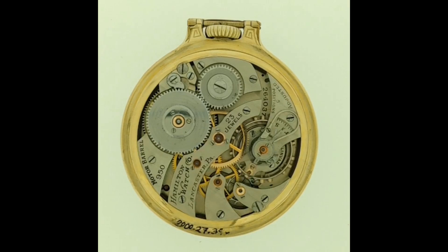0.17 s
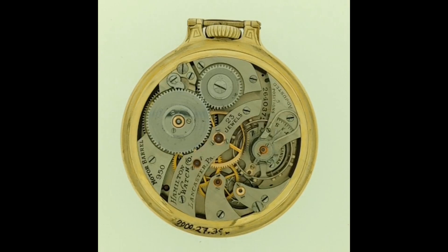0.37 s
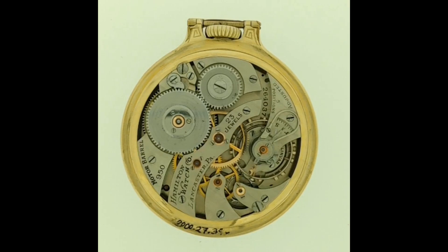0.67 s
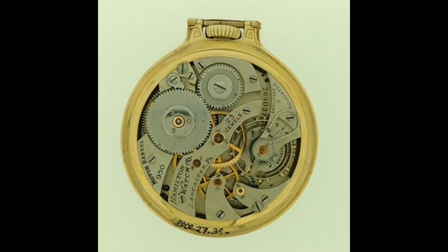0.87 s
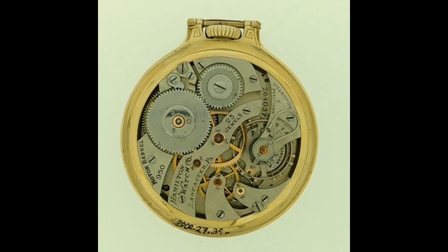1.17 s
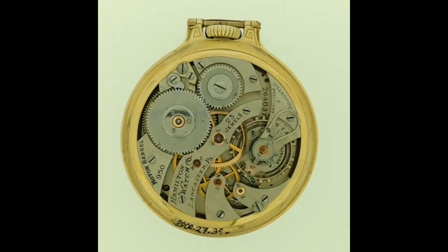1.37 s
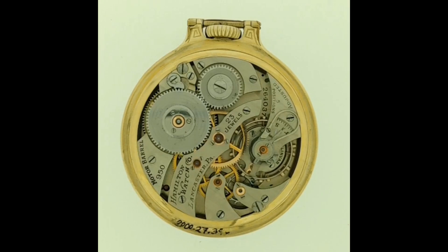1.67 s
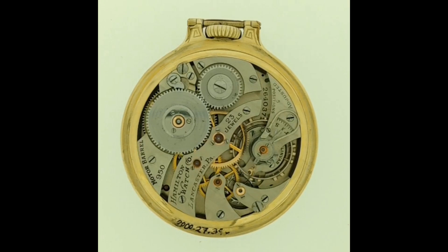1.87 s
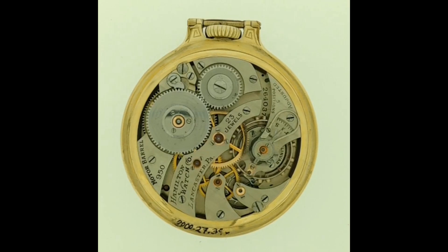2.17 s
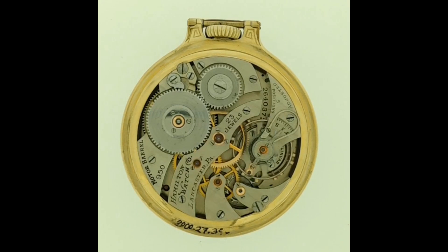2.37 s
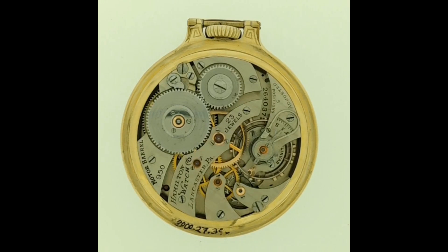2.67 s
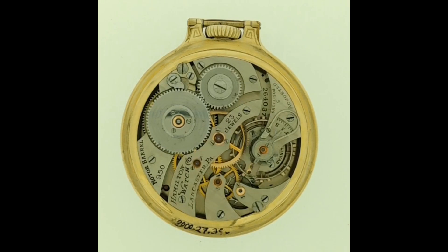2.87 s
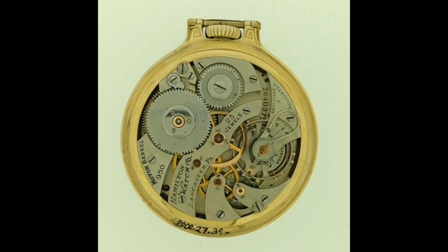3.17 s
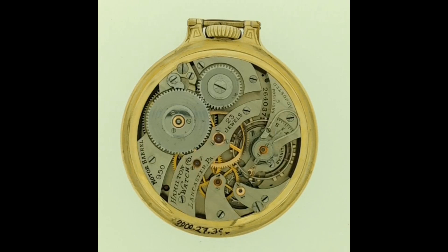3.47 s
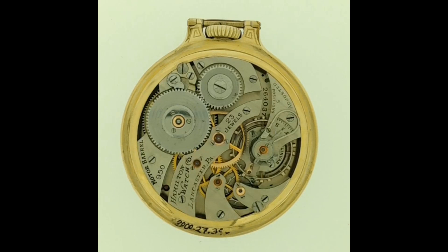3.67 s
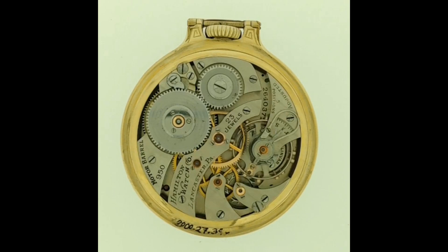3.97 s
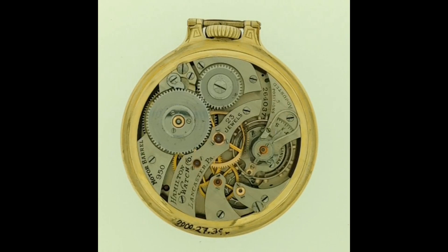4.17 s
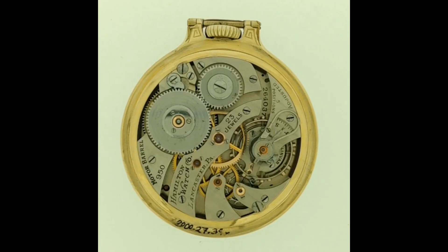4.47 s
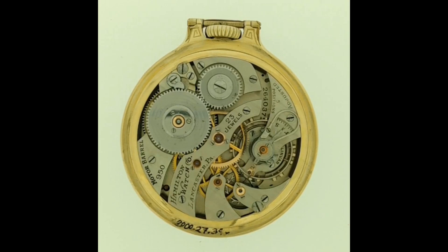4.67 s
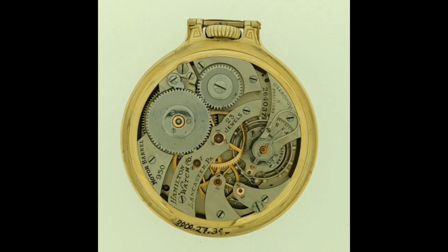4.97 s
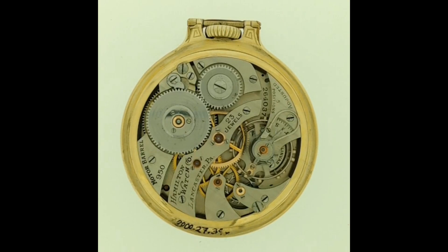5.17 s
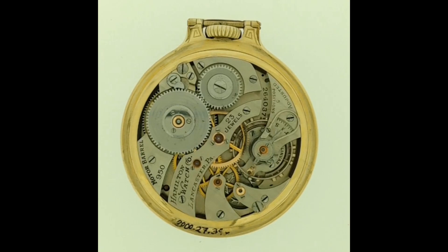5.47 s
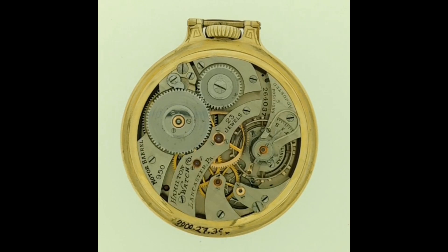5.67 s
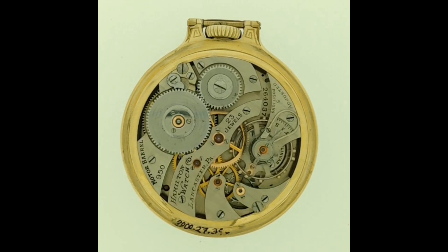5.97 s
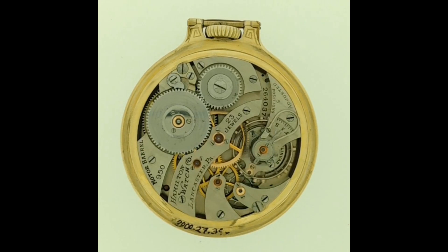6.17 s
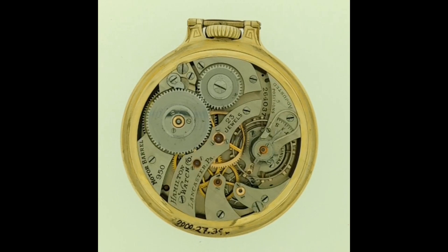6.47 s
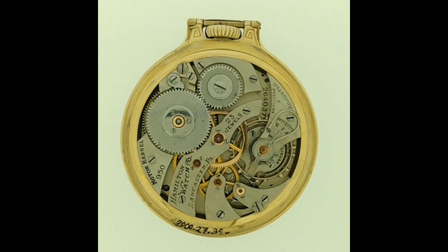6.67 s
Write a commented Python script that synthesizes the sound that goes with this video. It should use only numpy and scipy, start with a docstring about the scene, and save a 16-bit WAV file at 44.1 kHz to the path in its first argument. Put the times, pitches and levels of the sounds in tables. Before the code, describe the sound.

A pocket watch ticks thin, bright and even, five beats a second, over low ventilation hum and rumble, with one sharp click at the end.

```python
"""Ventilation and the building's rumble, noise-driven modes with motor tones, sound from the start.
From 0.16 s a pocket watch beats five times a second: runs of contacts ring its movement in modes.
From 1.3 to 5.2 s faint taps sound nearby, each a decaying burst of resonant noise in the room.
Near 5.8 s comes a tiny squeak, a rising sine; at 6.83 s a sharp click of noise and body modes is last."""
import sys
import numpy as np
from scipy import signal
from scipy.fft import rfft, irfft, next_fast_len
from scipy.io import wavfile

SR = 44100
rng = np.random.default_rng(int(sys.argv[2]) if len(sys.argv) > 2 else 0)


def transcribe(u):
    """Save the signal u as a 16-bit wav file named by the first command-line argument.

    u: samples, shape (n,) or (channels, n), limited to [-1, 1]; the rate is SR.
    q: integer samples, one column per channel.
    """
    v = np.clip(np.atleast_2d(u).T, -1, 1)
    q = np.round(v * 32767).astype(np.int16)
    wavfile.write(sys.argv[1], SR, q)


N = 301644  # length in samples

# the balance: first beat, time from beat to beat, and how late every tock falls (s)
FIRST_BEAT_S, BEAT_S, TOCK_LATE_S = .1624, .199869, .00283
# drive of a tick, a tock's extra, standard deviation from beat to beat (dB)
TICK_DB, TOCK_EXTRA_DB, BEAT_SCATTER_DB = -60, 0.7, 0.45
# gear teeth pass on the spring's force unevenly: period and a peak (s), swing either way (dB)
MESH_S, MESH_PEAK_S, MESH_DB = 1.013, .258, 0.7
# small level offsets of some beats: [t/s, added level/dB]
BEAT_OFFSETS = [(.365, 0.8), (1.164, 1.5), (1.362, 0.7), (2.764, 0.5), (4.362, 0.2), (5.162, 1.5)]


def watch(wet_db=-6.5):
    """Isochronism: the balance swings at an even rate, so its two pallets take turns."""
    track = np.zeros(N)
    lead = 1 / 32  # s kept free before the drop for the earlier contacts
    for count, due in enumerate(np.arange(FIRST_BEAT_S, N / SR, BEAT_S)):
        side = count % 2  # 0 tick, 1 tock
        s = due + side * TOCK_LATE_S
        mesh_db = MESH_DB * np.cos(2 * np.pi * (s - MESH_PEAK_S) / MESH_S)
        offset_db = sum(db for at, db in BEAT_OFFSETS if abs(at - s) < BEAT_S / 2)
        chance_db = BEAT_SCATTER_DB * rng.standard_normal()
        db = TICK_DB + side * TOCK_EXTRA_DB + mesh_db + offset_db + chance_db
        sound = beat(side, lead, scatter_db=2.1, crack_db=-3.5, crack_t60=0.015, jitter=.00025, uneven_db=0.7)
        sound = in_room(np.pad(sound, (0, SR // 10)), wet_db)
        add(track, s - lead, amp(db) * sound)
    return track


# contacts of one beat (unlocking, impulse, drop onto the pallet, rebounds), before chance:
# [t/s from the drop, relative level/dB]
TICK_CONTACTS = [(-.0225, -11), (-.0208, -14), (-.0187, -12), (-.0122, -12.5), (-.0095, -17), (-.0045, -19),
                 (-.0008, -8), (0, -2), (.0015, -12), (.003, -7)]
TOCK_CONTACTS = [(-.0228, -11), (-.022, -12), (-.0195, -20), (-.0078, -12.5), (-.0038, -17), (-.0007, -8),
                 (0, -2), (.0016, -8), (.0036, -5.5)]
# modes of plates and case: [f/Hz, t60/s, relative level in a tick/dB, in a tock/dB]
MOVEMENT_MODES = [(2174, 0.05, -11.5, -5), (4146, 0.041, -5, -1.5), (4490, 0.025, -22, -2),
                  (4720, .028, -12, -10), (4820, 0.055, -21, -4), (5020, 0.085, -8.5, -9.5),
                  (5120, .028, -8.5, -11), (5320, 0.012, -12, -1), (5570, 0.025, -6, -2),
                  (5660, 0.017, -21, -26), (5800, .021, -20, -15), (6170, 0.018, -13, -16),
                  (6260, 0.037, -8.5, -24), (6470, 0.015, -2.5, -1.5), (6610, 0.013, -3.5, -4),
                  (6480, .021, -10, -7), (7600, 0.0094, -14, 2), (7730, 0.015, -21, 4),
                  (8050, 0.02, 2, -12), (7940, 0.0082, -1.5, 8), (8730, 0.024, -28, -4),
                  (8180, .016, -3.5, -17), (8670, 0.021, -8, -3), (8760, 0.0092, -9, -6.5),
                  (8850, 0.028, -2, 6), (8920, 0.018, -4.5, -7), (9420, 0.028, -2.5, -1),
                  (9950, 0.025, -3.5, -6), (10220, 0.029, -2, -1), (10740, .017, -11, -10)]


def beat(side, lead, scatter_db, crack_db, crack_t60, jitter, uneven_db):
    """Impact excitation: steel on jewel cracks faintly and feeds energy into the movement's modes."""
    t = np.arange(SR // 12) / SR
    hz, t60, *levels = np.transpose(MOVEMENT_MODES)[:, :, None]
    ring_energy, crack_energy = 0, 0
    for delay, db in (TICK_CONTACTS, TOCK_CONTACTS)[side]:
        slip, force = rng.standard_normal(2)
        since = t - lead - delay - jitter * slip
        blow = amp(db + uneven_db * force) ** 2 * (since > 0)
        ring_energy = ring_energy + blow * np.exp(-2 * np.log(1000) * np.abs(since) / t60)
        crack_energy = crack_energy + blow * np.exp(-2 * np.log(1000) * np.abs(since) / crack_t60)
    strength = amp(levels[side] + scatter_db * rng.standard_normal(hz.shape))
    tones = np.sin(2 * np.pi * (hz * t + rng.random(hz.shape)))
    ring = np.sum(strength * np.sqrt(ring_energy) * tones, axis=0)
    band = signal.butter(3, (4300, 11000), "bandpass", fs=SR, output="sos")
    crack = np.sqrt(crack_energy) * unit(signal.sosfilt(band, rng.standard_normal(len(t))))
    return ring / np.linalg.norm(strength) + amp(crack_db) * crack


# three contacts of the sharp click: [t/s, snap level/dB, body level/dB]
CLICK_CONTACTS = [(6.8312, -35, -32), (6.8342, -46, -27), (6.8366, -42, -23)]
# spectrum of the snap: [f/Hz, relative level/dB]
CLICK_COLOUR = [(300, -10), (1400, 2.5), (2100, -6), (2900, 4), (3800, -9.5), (4600, -5.5), (5900, -3),
                (7000, -14.5), (8700, -13), (11000, -36), (12000, -50)]
# modes of the clicking object's hollow body: [f/Hz, relative level/dB]
CLICK_BODY = [(410, -1.5), (720, 1.5), (1010, -3), (1430, -2.5), (2700, -9.5), (3150, -14)]


def click(body_db=0, body_t60=0.012):
    """Superposed impacts: a hard snap whose hollow body builds over three quick contacts."""
    t = np.arange(N) / SR
    snap = sum(amp(db) * decay(t - s, t60=0.029, attack=0.00051) for s, db, _ in CLICK_CONTACTS)
    swell = sum(amp(db + body_db) * decay(t - s, body_t60, attack=0.0017) for s, _, db in CLICK_CONTACTS)
    ring = sum(amp(db) * np.sin(2 * np.pi * (hz * t + rng.random())) for hz, db in CLICK_BODY)
    return snap * coloured(CLICK_COLOUR) + swell * unit(ring)


# small taps nearby: [t/s, level before a common gain/dB, main resonance f/Hz]
TAPS = [(1.2753, -73, 1660), (1.4617, -72.5, 1550), (1.9014, -76, 2220), (2.723, -73.5, 2850),
        (2.8644, -72.5, 1690), (3.8013, -75, 1300), (4.254, -77, 2150), (4.352, -74, 1650),
        (4.5635, -73.5, 1610), (4.6693, -74, 2300), (5.0448, -61.5, 2290), (5.1617, -69.5, 1650)]
# spectrum shared by the taps: [f/Hz, relative level/dB]
TAP_COLOUR = [(200, -17), (600, 11.5), (1100, -9.5), (1600, -2), (2500, -9), (3200, -10), (4600, -6.5),
              (7000, -19), (10000, -18), (13000, -23)]


def taps(gain_db=8.0, ring_db=1, width_hz=550):
    """Damped resonance: dull little knocks, each around its listed main resonance, blurred by the room."""
    track, t = np.zeros(N), np.arange(SR // 8) / SR
    for s, db, centre in TAPS:
        colour = lambda hz: amp(along(TAP_COLOUR, hz)) + humps([(centre, width_hz, ring_db)], hz)
        knock = unit(noise(colour, size=len(t)))
        add(track, s, amp(db + gain_db) * decay(t, t60=0.065, attack=0.003) * knock)
    return in_room(track, wet_db=-14)


def squeak(from_hz=2400, to_hz=2900, db=-82):
    """Frequency modulation: the phase of one tiny squeak integrates a rising pitch."""
    progress = curve([(5.775, 0), (5.825, 1)])  # (t/s, share of the glide)
    pitch = from_hz + (to_hz - from_hz) * progress
    return amp(db) * np.sin(np.pi * progress) * np.sin(2 * np.pi * np.cumsum(pitch) / SR)


# broad air noise: [f/Hz, level per Hz/dB]
AIR = [(10, -102), (25, -82.5), (45, -85.5), (130, -85.5), (175, -88.5), (240, -90.5), (300, -101),
       (550, -105), (850, -113), (1250, -116), (3000, -119), (7000, -123), (9300, -126), (10600, -137)]
# duct and room resonances: [f/Hz, width/Hz, level per Hz/dB]
DUCT_MODES = [(190, 5.2, -80.5), (259.1, 16.8, -83), (271.8, 10, -86), (459, 58, -99), (639, 96, -100),
              (751, 51, -100), (1002, 98, -106), (1419, 76, -108), (1592, 44, -111), (1655, 68, -109),
              (2132, 87, -114), (2276, 71, -116)]
# low room modes: [f/Hz, width/Hz, relative level/dB]
DRONE_MODES = [(84.5, 23, -1), (93.5, 18, 4.5), (116.5, 24, 4), (128.5, 14, 5), (148.3, 9, 0.5),
               (151, 16, -21)]
# course of the low drone: [t/s, level before a common gain/dB]
DRONE_LEVEL = [(0, -52), (.2, -44.5), (.38, -48), (.9, -52), (1.06, -45.5), (1.4, -51.5), (2.02, -46.5),
               (2.26, -53), (2.9, -43), (3.12, -51.5), (3.95, -48), (4.38, -48.5), (4.5, -53), (4.75, -51),
               (5.5, -47), (5.85, -52), (6.12, -49.5), (6.8, -49)]
# motor lines: [f/Hz, level/dB]
MOTOR = [(60, -59.5), (119.6, -57)]


def ventilation(drone_db=-1.0):
    """Turbulence and modal response: rushing air excites ducts and low room modes over a motor's hum."""
    t = np.arange(N) / SR
    air = noise(lambda hz: np.hypot(amp(along(AIR, hz)), humps(DUCT_MODES, hz)))
    drone = amp(curve(DRONE_LEVEL) + drone_db) * resonating(DRONE_MODES, steady=0.3)
    # sqrt(2) gives each sine the rms of its level
    hum = sum(amp(db) * np.sqrt(2) * np.sin(2 * np.pi * (hz * t + rng.random())) for hz, db in MOTOR)
    return air + drone + hum


# modes of the building's floor: [f/Hz, width/Hz, relative level/dB]
FLOOR_MODES = [(42, 2.7, -10), (61.75, 12.1, 1.5), (75.3, 4.7, -17.5)]
# swells of rumble in the floor: [t/s at mid-rise, length/s, level/dB]
SWELLS = [(0.01, 0.19, -48.5), (1.18, .28, -43), (1.931, 0.037, -36.5), (2.373, 0.11, -39),
          (3.591, 0.072, -43.5), (3.804, 0.051, -42.5), (4.268, 0.066, -39.5), (4.581, 0.153, -40),
          (5.102, 0.18, -44)]
SWELL_ATTACK_S, SWELL_RELEASE_S = 0.033, 0.062  # rise time; time constant of the fall
RUMBLE_REST_DB = -57  # the floor between swells


def building():
    """Addition of powers: over a faint steady rumble each swell rises quickly, holds and dies away."""
    t = np.arange(N) / SR
    power = amp(RUMBLE_REST_DB) ** 2
    for s, length, db in SWELLS:
        rise = np.clip((t - s) / SWELL_ATTACK_S + .5, 0, 1)
        fall = np.exp(-np.maximum(t - s - length, 0) / SWELL_RELEASE_S)
        power = power + (amp(db) * rise * fall) ** 2
    return np.sqrt(power) * resonating(FLOOR_MODES, steady=0.15)


def resonating(modes, steady):
    """Random excitation of modes at rms 1, with swings slower than `steady` seconds largely evened out."""
    x = unit(noise(lambda hz: humps(modes, hz)))
    power = filtered(x ** 2, lambda hz: np.exp(-(hz * steady) ** 2))
    return unit(x / np.sqrt(np.abs(power) + 0.074))


# reverberation of the room: [f/Hz, t60/s]
ROOM = [(300, 0.069), (2000, 0.17), (5000, 0.045), (10000, 0.11)]


def in_room(x, wet_db, first_echo=.006):
    """Reverberation: after the first echo's delay a diffuse tail decays at its own rate per frequency."""
    hz, t, z = signal.stft(rng.standard_normal(SR // 5), SR, nperseg=256)
    fading = z * np.exp(-np.log(1000) * t / along(ROOM, hz)[:, None])
    tail = signal.istft(fading, SR, nperseg=256)[1]
    tail = np.pad(tail, (round(first_echo * SR), 0))
    return x + amp(wet_db) * signal.fftconvolve(x, tail / np.linalg.norm(tail))[:len(x)]


def decay(t, t60, attack):
    """Exponential decay: envelope of a blow at t = 0, with the attack as a time constant."""
    t = np.maximum(t, 0)
    return (1 - np.exp(-t / attack)) * np.exp(-np.minimum(np.log(1000) * t / t60, 20))


def humps(modes, hz):
    """Resonance: gain of steep-sided modes that add in power."""
    power = 0
    for centre, width, db in modes:
        power = power + (amp(db) / (1 + ((hz - centre) / width * 2) ** 2 / 2)) ** 2
    return np.sqrt(power)


def coloured(points):
    """Spectral shaping: noise of rms 1 with a (f/Hz, level/dB) spectrum."""
    return unit(noise(lambda hz: amp(along(points, hz))))


def noise(response, size=N):
    """Spectral density: noise whose level per Hz is the response."""
    x = filtered(rng.standard_normal(size + SR // 2), response)
    return x[SR // 4:][:size] * np.sqrt(SR / 2)


def filtered(x, response):
    """Linear filtering: the spectrum of x times a response of frequency."""
    m = next_fast_len(len(x) + SR // 2)
    return irfft(rfft(x, m) * response(np.fft.rfftfreq(m, 1 / SR)), m)[:len(x)]


def along(points, hz):
    """Logarithmic interpolation: (f/Hz, value) points read on a log axis."""
    f, v = np.transpose(points)
    return np.interp(np.log(hz + 1), np.log(f), v)


def curve(rows):
    """Linear interpolation: (t/s, value) rows as one value per sample."""
    return np.interp(np.arange(N) / SR, *np.transpose(rows))


def amp(db):
    """Decibel law: amplitude gain of a level in dB."""
    return 10 ** (np.asarray(db) / 20)


def unit(x):
    """Normalisation: x at rms 1."""
    return x / np.sqrt(np.mean(x ** 2) + 1e-30)


def add(track, s, sound):
    """Superposition: mix a sound into the track at time s."""
    part = track[max(round(s * SR), 0):][:len(sound)]
    part += sound[:len(part)]


def scene():
    """Superposition: everything as it reaches one microphone."""
    return (watch() + taps() + squeak() + click() + ventilation() + building())[None]


BAND_HZ, TOP_HZ = 11050, 15700  # the treble drops at the first and ends at the second


def record(dry, low_hz=34, shelf_db=-11):
    """Band limitation: the recorder cuts deep bass, drops the treble, adds a faint hiss and then ends."""
    low_cut = lambda hz: hz ** 4 / np.sqrt(hz ** 8 + float(low_hz) ** 8)
    band = filtered(dry[0], lambda hz: low_cut(hz) * np.where(hz < BAND_HZ, 1, amp(shelf_db)))
    hiss = noise(lambda hz: amp(-136.2))  # dB per Hz
    return filtered(band + hiss, lambda hz: hz < TOP_HZ)[None]


dry = scene()
out = record(dry)
transcribe(out)
```